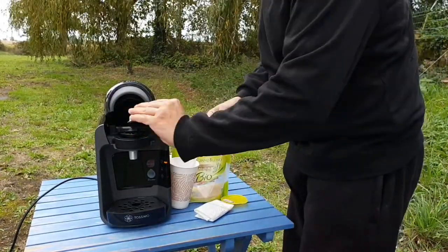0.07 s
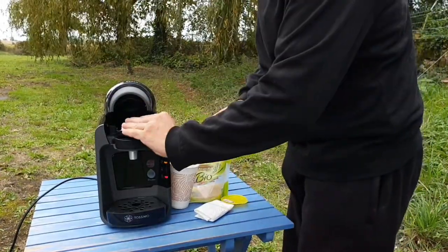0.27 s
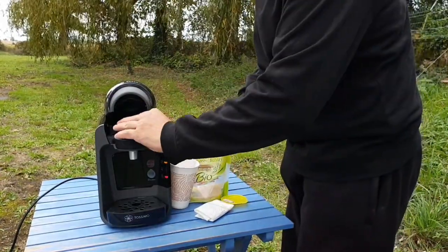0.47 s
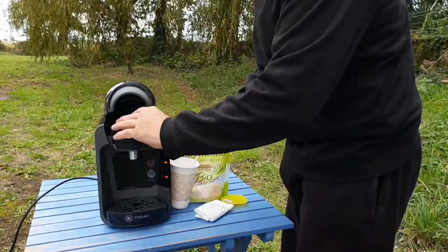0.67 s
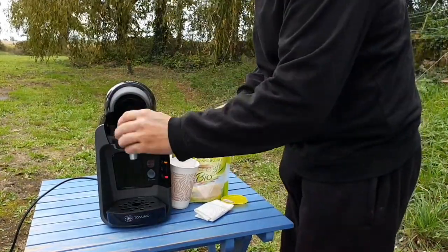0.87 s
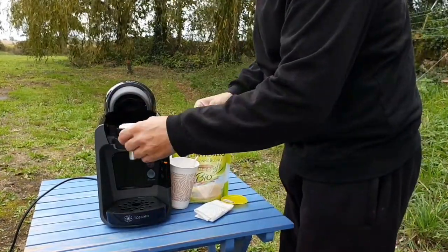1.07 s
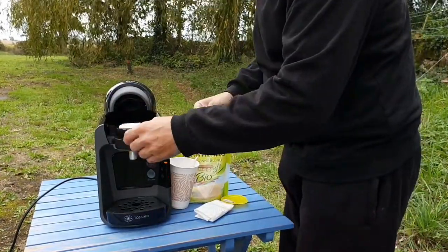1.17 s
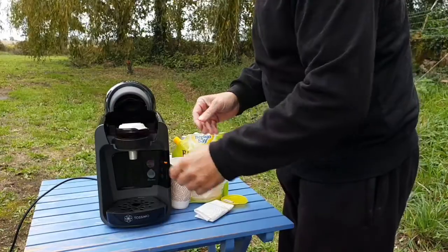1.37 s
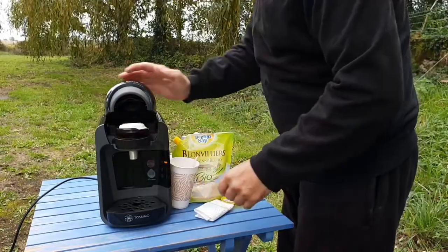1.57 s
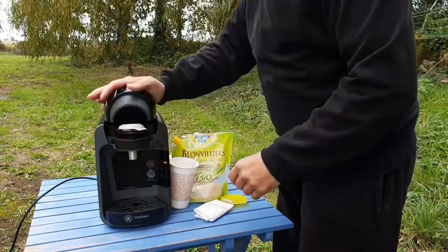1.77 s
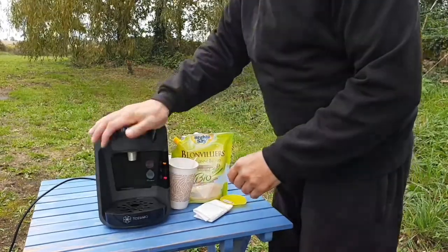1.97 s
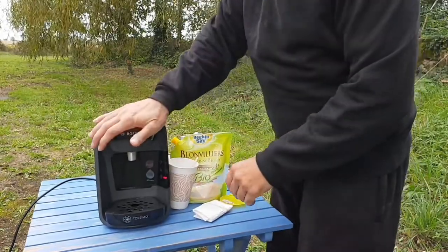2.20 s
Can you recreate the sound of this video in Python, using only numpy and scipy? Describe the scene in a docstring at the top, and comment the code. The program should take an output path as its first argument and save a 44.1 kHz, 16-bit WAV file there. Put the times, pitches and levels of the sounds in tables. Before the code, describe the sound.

Hollow plastic taps, then a coffee machine lid clacks shut over low wind rumble.

```python
"""A few hollow plastic taps, then a scrape and a sharp clack, over a low rumble of wind and a faint hiss.
A pod knocks and rubs as it is pressed into the holder of a plastic coffee machine on a garden table.
A hand pushes the lid shut: the latch snaps, the mechanism scrapes down over the pod and the lid
knocks against its stop. The rumble is light wind blowing on a close pair of microphones."""
import sys
import numpy as np
from scipy import signal
from scipy.fft import rfft, irfft
from scipy.io import wavfile

SR = 44100
rng = np.random.default_rng(int(sys.argv[2]) if len(sys.argv) > 2 else 0)


def generate_wav(signal):
    """Clip the signal to [-1, 1] and save it as 16-bit WAV at the path in sys.argv[1]."""
    frames = np.transpose(np.atleast_2d(signal))
    scaled = np.clip(frames, -1, 1) * 32767
    pcm = np.round(scaled).astype(np.int16)
    wavfile.write(sys.argv[1], SR, pcm)


N = 98607

# the notes (modes) of the pod holder and the outer shell: f/Hz, level/dB, time to fade by 60 dB/s
HOLDER_MODES = [(330, -15, .08), (430, -13, .07), (772, 0, .075), (890, -24, .1), (1020, -2, .06),
                (1240, -3, .042), (1500, -13, .04), (1820, -20, .06)]
SHELL_MODES = [(295.4, -7.5, 0.17), (346.3, -5.5, 0.14), (498.5, -22, 0.29), (573, -13, 0.14),
               (1271, -6.5, 0.06), (1357, -8, 0.058), (1471, -10.5, 0.13), (1523, -1.5, 0.042),
               (2520, -12.5, 0.022)]
# tone of the plastic's dense, short ring: f/Hz, level/dB
PLASTIC_RING = [(100, -28), (350, 3.5), (780, -2.5), (1300, -8), (2200, -13), (4000, -12.5), (8000, -27),
                (16000, -30.5)]


def amp(db):
    """Turns decibels into a gain."""
    return 10 ** (np.asarray(db) / 20)


def unit(x):
    """Scales a sound to an average (rms) level of 1."""
    return x / np.sqrt(np.mean(x ** 2) + 1e-20)


def read(points, hz):
    """Looks up a table at any frequency, on a log scale."""
    f, value = np.transpose(points)
    return np.interp(np.log(hz + 1), np.log(f + 1), value)


def curve(points):
    """Joins points in time with straight lines."""
    return np.interp(np.arange(N) / SR, *np.transpose(points))


def fade(t, t60):
    """Dies away by 60 dB every t60 seconds."""
    return np.exp(-np.log(1000) * t / t60)


def add(mix, s, sound):
    """Mixes a sound in at s seconds."""
    part = mix[round(s * SR):][:len(sound)]
    part += sound[:len(part)]


def colour(x, tone, size=4096):
    """Filters a sound by a table of f/Hz, level/dB, so that nothing rings ahead of a blow."""
    log_gain = np.log(amp(read(tone, abs(np.fft.fftfreq(size, 1 / SR)))))
    taps = np.fft.ifft(np.exp(np.conj(signal.hilbert(log_gain)))).real
    return signal.fftconvolve(x, taps)[:len(x)]


def dying_noise(t60s, size, count=8):
    """Even noise whose frequency bands fade at their own speeds."""
    t, hz = np.arange(size) / SR, np.fft.rfftfreq(size, 1 / SR)
    phases = np.exp(2j * np.pi * rng.random(len(hz)))
    centres = np.geomspace(200, 14000, count)
    bands = [irfft(phases * read(list(zip(centres, own)), hz), size) for own in np.eye(count)]
    return np.sqrt(size) * sum(band * fade(t, read(t60s, f)) for band, f in zip(bands, centres))


def wander(rate_hz):
    """A smooth random drift."""
    hz = np.fft.rfftfreq(N, 1 / SR)
    return unit(irfft(rfft(rng.standard_normal(N)) * np.exp(-(hz / rate_hz) ** 2), N))


def hiss():
    """A faint, nearly steady outdoor hiss."""
    # tone of the hiss: f/Hz, level/dB
    tone = [(300, 3.5), (1100, -11), (2400, -7), (3200, -4.5), (4300, -1.5), (7000, -1.5), (8500, -8.5),
            (14000, -9), (16000, -18.5)]
    # its slight rise at the start: t/s, level/dB
    loudness = [(0, -62.5), (.5, -61)]
    return unit(colour(rng.standard_normal(N), tone)) * amp(curve(loudness))


def wind(lumps_db=3, eddy_growth=1.92):
    """Wind rumbles unevenly on a microphone; strong gusts add higher-pitched swirls (eddies)."""
    # strength of the gusts: t/s, level/dB
    gusts = [(0, -39), (.17, -57), (.27, -41.5), (.35, -51), (.46, -51.5), (.56, -40), (.72, -49),
             (.88, -45), (.95, -36), (1.08, -45.5), (1.2, -37), (1.45, -50), (1.62, -44.5), (1.68, -34.5),
             (1.95, -41.5), (2.23, -48.5)]
    # tones of the rumble and the eddies: f/Hz, level/dB
    rumble_tone = [(15, -10), (35, -2), (90, 5), (190, -14), (450, -33), (2500, -84)]
    eddy_tone = [(30, -22), (150, 3.5), (250, -9.5), (400, -19), (700, -31.5), (2000, -50.5)]
    gust_db = curve(gusts)
    flutter_db = lumps_db * wander(rate_hz=76)
    eddy_db = -49.5 + eddy_growth * (gust_db + 37.5)
    rumble = unit(colour(rng.standard_normal(N), rumble_tone)) * amp(gust_db + flutter_db)
    eddies = unit(colour(rng.standard_normal(N), eddy_tone)) * amp(eddy_db + flutter_db)
    return rumble + eddies


def puffs(pitch_hz=97, width_cycles=0.74):
    """Single eddies give a microphone a brief, uneven push and pull."""
    # eddies arriving: t/s, peak level/dB
    arrivals = [(0.101, -44), (0.544, -34), (0.694, -35), (0.769, -30.5), (.94, -30), (1.031, -30.5),
                (1.201, -31.5), (1.321, -35), (1.58, -33.5), (1.687, -24.5), (1.841, -31)]
    t, out = np.arange(N) / SR, np.zeros(N)
    wobble = 0.22 * wander(rate_hz=93)
    for s, db in arrivals:
        cycles = (t - s) * pitch_hz
        swell = amp(db) * np.exp(-(cycles / width_cycles) ** 2)
        out += swell * np.cos(2 * np.pi * (cycles + wobble + rng.random()))
    return out


def garden(x, echo_db=-17, size=22050):
    """The table, ground and trees scatter a weak echo."""
    # length of the echo: f/Hz, time to fade by 60 dB/s
    fade_times = [(550, 0.61), (900, 0.35), (12000, 0.36)]
    tail = dying_noise(fade_times, size)
    return amp(echo_db) * signal.fftconvolve(x, tail / np.linalg.norm(tail))[:N]


def ringing(modes, size=8192):
    """A struck part rings with a few fading notes."""
    t = np.arange(size) / SR
    notes = sum((-1) ** k * amp(db) * fade(t, t60) * np.sin(2 * np.pi * hz * t)
                for k, (hz, db, t60) in enumerate(modes))
    return notes / np.linalg.norm(notes)


def knock(modes, ring_tone, ring_db, tick_db, size=8192):
    """One blow on plastic: a tick, a dense short ring and the part's own notes."""
    # length of the ring: f/Hz, time to fade by 60 dB/s
    fade_times = [(300, 0.13), (1500, 0.069), (4000, 0.034), (12000, 0.019)]
    ring = dying_noise(fade_times, size)
    ring[0] += amp(tick_db)
    ring = colour(ring, ring_tone)
    blow = ringing(modes) + amp(ring_db) * ring / np.linalg.norm(ring)
    return blow / np.std(blow[:SR // 100])  # the first 10 ms set the level


def scrape(loudness, tone, modes, slips_per_s=6000, spread_db=3.5, modes_db=-8):
    """Sliding is many tiny random slips; each one clicks and rings the plastic."""
    slips = (rng.random(N) < slips_per_s / SR) * rng.choice([-1, 1], N)
    slips = slips * amp(spread_db * np.clip(rng.standard_normal(N), -2, 2))
    t = np.arange(N) / SR
    moving = (t > loudness[0][0]) & (t < loudness[-1][0])
    friction = unit(slips) * amp(curve(loudness)) * moving
    notes = ringing(modes)
    click = colour(signal.unit_impulse(len(notes)), tone)
    one_slip = click / np.linalg.norm(click) + amp(modes_db) * notes
    return signal.fftconvolve(friction, one_slip / np.linalg.norm(one_slip))[:N]


def palm():
    """A hand brushes the lid."""
    # the brushing: t/s, level/dB
    strokes = [(1.705, -79), (1.725, -52.5), (1.765, -71), (1.778, -56.5), (1.795, -67)]
    return scrape(strokes, PLASTIC_RING, SHELL_MODES)


def pod():
    """Fingers rock the pod into its holder, where it taps and rubs."""
    # the taps: t/s, level/dB, hollow ring/dB, treble/dB
    taps = [(.1805, -39, -1, 5), (.1857, -39, 2, -24), (0.2904, -35.5, -8.5, 11.5), (.2942, -38.5, -17, 15),
            (.2981, -42, -1, -30), (0.364, -59.5, -8, -3), (0.437, -43, -3.5, 7.5)]
    # the rubbing: t/s, level/dB
    rubbing = [(.15, -72), (.16, -50.5), (.2, -51.5), (.24, -61), (.26, -50.5), (.3, -61), (.41, -69),
               (.43, -52), (.46, -61.5), (.51, -68)]
    out = np.zeros(N)
    for s, db, hollow_db, treble_db in taps:
        tone = [(350, 0), (770, hollow_db), (1100, 0.0059), (5000, treble_db)]
        blow = knock(HOLDER_MODES, PLASTIC_RING, ring_db=-5, tick_db=13)
        add(out, s, amp(db) * colour(blow, tone))
    return out + scrape(rubbing, PLASTIC_RING, HOLDER_MODES)


def mechanism():
    """The lid's mechanism scrapes down over the pod."""
    # the sliding: t/s, level/dB
    sliding = [(1.885, -66), (1.9, -41), (1.93, -39.5), (1.953, -43), (1.962, -30.5), (1.985, -30),
               (2.005, -35.5), (2.028, -34), (2.045, -44.5), (2.1, -59.5)]
    # tone of the scrape: f/Hz, level/dB
    tone = [(120, -16), (330, 8), (1600, 2), (2800, -2), (4000, 2.5), (5500, -8), (9000, -23.5),
            (16000, -27)]
    return scrape(sliding, tone, SHELL_MODES)


def lid():
    """The lid rides over the latch and drops onto its stop; each contact has its own thud."""
    # the contacts: t/s, level/dB, thud f/Hz, thud/dB, middle/dB, treble/dB
    hits = [(1.908, -27.5, 361, -8, -11, -7), (1.9213, -26.5, 346, -1.5, -3.5, 6),
            (1.958, -34, 697, -2, 4.5, -3.5), (1.98, -34, 342, 2, 4.5, -12),
            (2.012, -29, 422, -2.5, 6.5, -3), (2.022, -40.5, 571, 11, 4, -1)]
    # tone of the shell's short ring: f/Hz, level/dB
    shell_ring = [(150, -9), (330, -5), (900, -3.5), (1600, 3.5), (2600, -3.5), (4200, 7.5), (9000, -23),
                  (16000, -53)]
    out = np.zeros(N)
    for s, db, thud_hz, thud_db, middle_db, treble_db in hits:
        tone = [(330, -7), (800, middle_db), (1350, 1.5), (3500, treble_db)]
        blow = colour(knock(SHELL_MODES, shell_ring, ring_db=0, tick_db=8), tone)
        t = np.arange(len(blow)) / SR
        thud = 2 * np.sin(2 * np.pi * thud_hz * t) * fade(t, t60=0.048)
        add(out, s, amp(db) * (blow + amp(thud_db) * thud))
    return out


def cracks(size=2048):
    """Dry plastic cracks as the latch snaps and the lid hits its stop."""
    # the cracks: t/s, level/dB
    snaps = [(1.9046, -36), (1.921, -22.5), (1.921, -19), (1.9253, -23), (1.957, -38), (2.012, -33),
             (2.077, -48)]
    # tone of a crack: f/Hz, level/dB
    tone = [(200, -14.5), (1300, 2.5), (2000, -7.5), (2500, 13.5), (3500, -3), (5800, -1.5), (9000, -18),
            (12000, -13), (16000, -27)]
    t, out = np.arange(size) / SR, np.zeros(N)
    for s, db in snaps:
        crack = colour(rng.standard_normal(size) * fade(t, t60=0.0085), tone)
        add(out, s, amp(db) * crack / np.std(crack[:SR // 500]))  # the first 2 ms set the level
    return out


def scene(lag_s=0.00012, left_db=1.5, right_db=-1):
    """The machine stands a little to the left, so the right microphone hears it later and softer."""
    machine = pod() + palm() + cracks() + lid() + mechanism()
    lag_cycles = np.minimum(np.fft.rfftfreq(N, 1 / SR) * lag_s, 1)  # no delay in the top treble
    later = irfft(rfft(machine) * np.exp(-2j * np.pi * lag_cycles), N)
    sides = amp(left_db) * machine, amp(right_db) * later
    return np.array([direct + garden(machine) + wind() + puffs() + hiss() for direct in sides])


def record(dry):
    """Cuts off the treble above 16100 Hz."""
    low_pass = signal.firwin(511, 16100, window=("kaiser", 9), fs=SR)
    return signal.oaconvolve(dry, low_pass[None], "same")


dry = scene()
out = record(dry)
generate_wav(out)
```